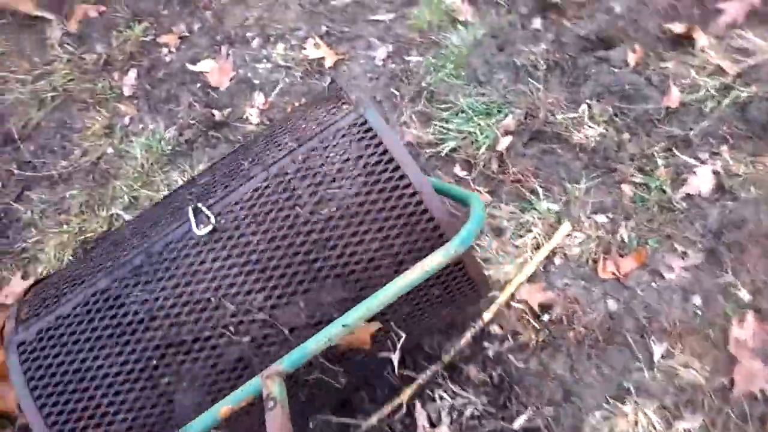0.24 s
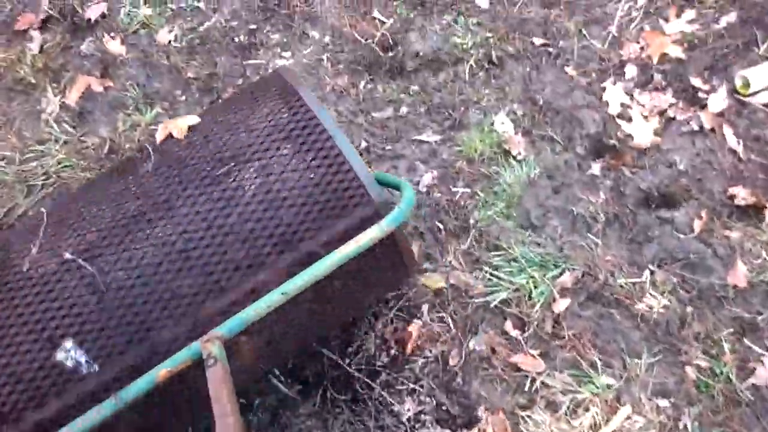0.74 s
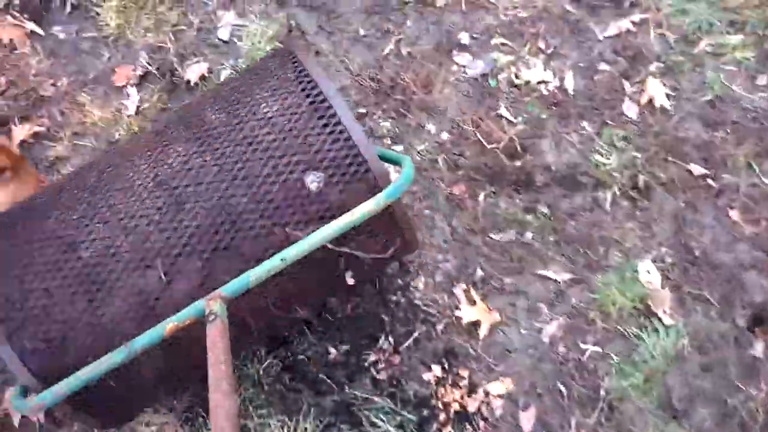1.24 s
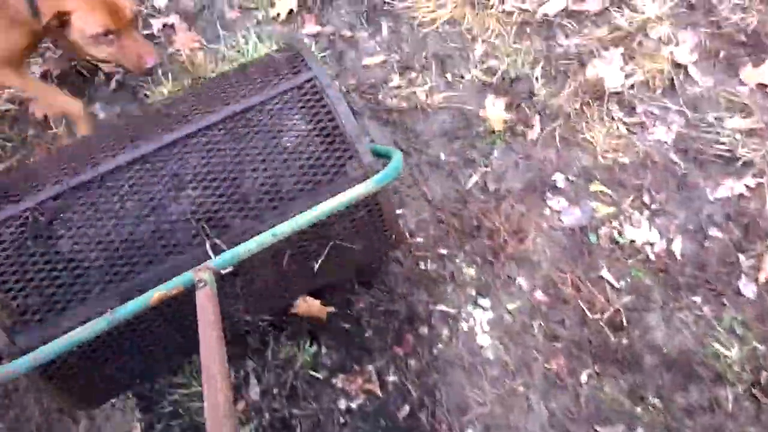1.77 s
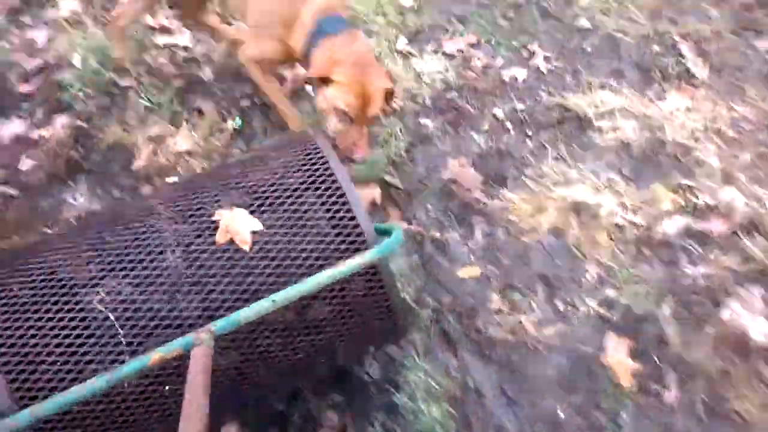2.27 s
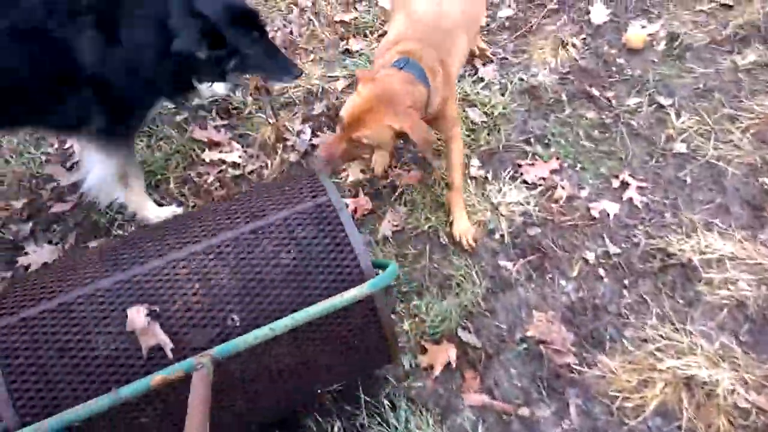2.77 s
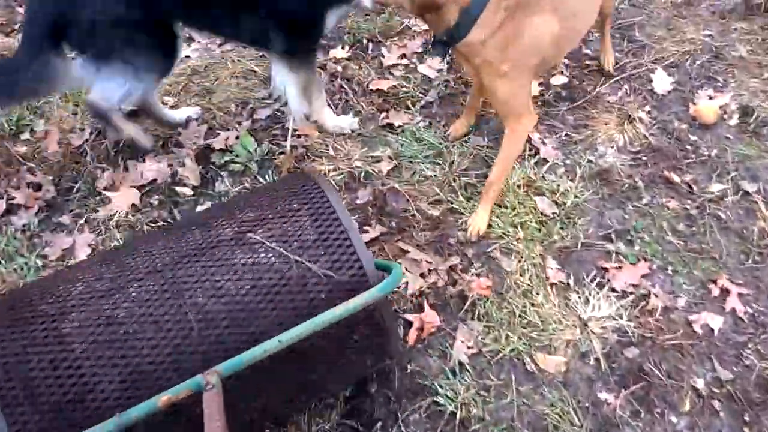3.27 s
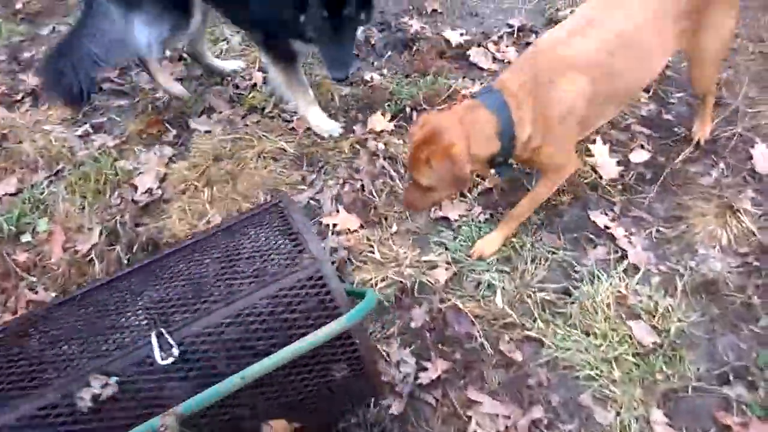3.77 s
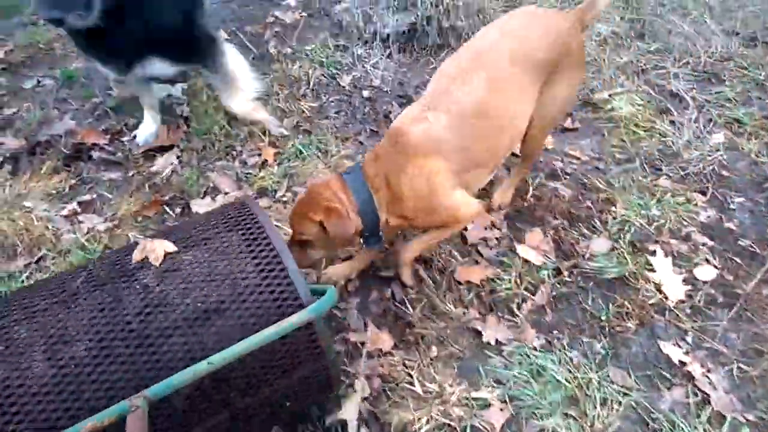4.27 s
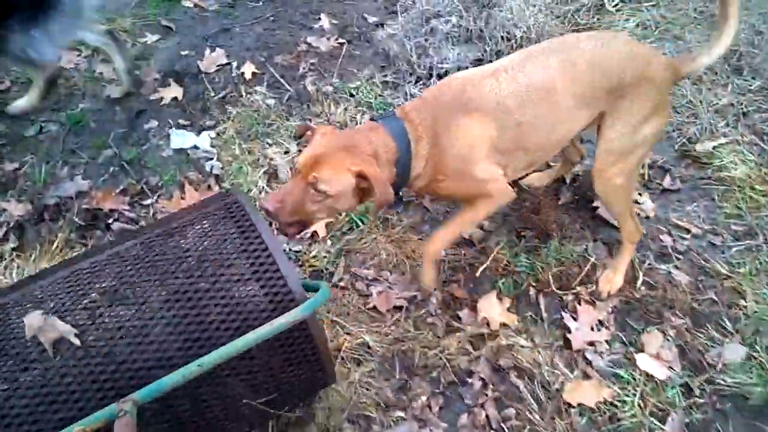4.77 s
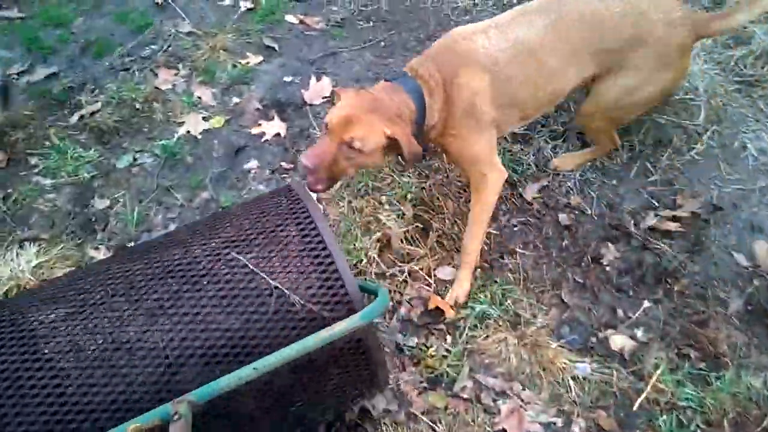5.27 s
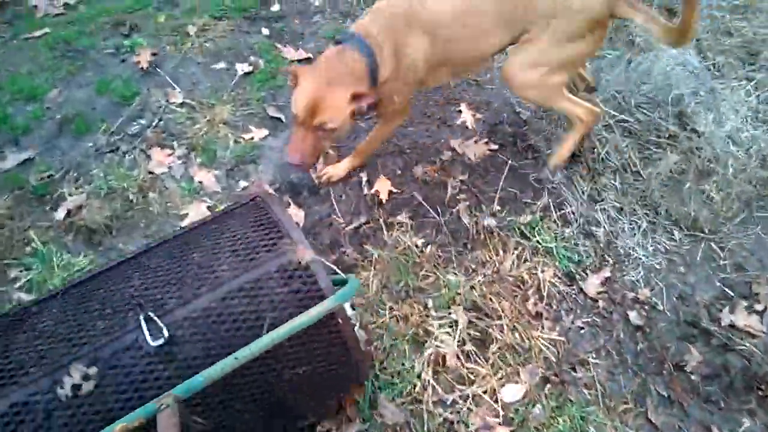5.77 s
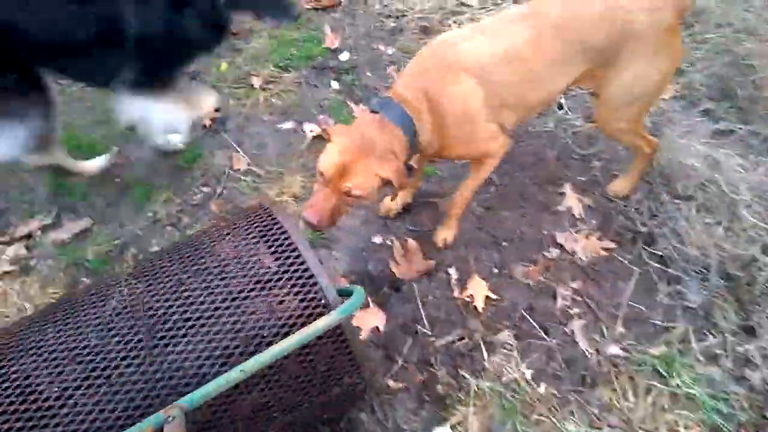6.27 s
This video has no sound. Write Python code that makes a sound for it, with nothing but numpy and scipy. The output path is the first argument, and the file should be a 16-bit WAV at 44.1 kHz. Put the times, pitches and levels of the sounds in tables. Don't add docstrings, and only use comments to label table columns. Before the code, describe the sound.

A loud hoarse bark is already under way at 0 s and falls off, with crackling leaves under it. A thinner arched yelp follows at 0.25-0.5 s, a high bark at 0.65, a tiny yelp near 1.15 and a short rising bark at 1.45. A clipped rough bark comes at 2.25, then a long falling yelp at 2.6-2.85, a low muttered woof at 2.95 and a thin quiet whine at 3.15. Barking pauses until about 4.15: dry leaves rustle, twigs tick, a paw thuds at 3.45. Then raspy barks at 4.15, 4.75, 5.25, 5.75 and 6.25, with small grumbles between and a thud at 4.5. Axle squeaks are thin and quiet, clearest at 4.3 and 6.25. Faint dog moans sit near 1.2, 1.7 and 4.5. Dull short yard echoes and low distant traffic hum throughout.

```python
import sys
import numpy as np
from scipy import signal
from scipy.fft import rfft, irfft
from scipy.io import wavfile
from scipy.ndimage import uniform_filter1d

SR = 44100
rng = np.random.default_rng(int(sys.argv[2]) if len(sys.argv) > 2 else 0)


def to_wav(sig):
    pcm = np.clip(np.atleast_2d(sig), -1, 1) * 32767
    pcm = np.round(pcm).astype(np.int16)
    wavfile.write(sys.argv[1], SR, pcm.T)


def linear_from_db(decibels):
    return 10 ** (np.asarray(decibels, float) / 20)


N = 287091

# t/s, hold/s, start f/Hz, end f/Hz, level/dB
BARKS = [
    (-0.1, .13, 371, 346, -10),
    (0.655, 0.1, 505.8, 489, -11),
    (1.473, 0.074, 534.5, 564, -12),
    (2.251, 0.055, 490.3, 546, -10.5),
    (4.167, 0.082, 486.3, 506, -10),
    (4.764, 0.094, 518.7, 530.3, -11.5),
    (5.262, .09, 534, 498.4, -12.5),
    (5.732, 0.094, 457, 479.5, -10.5),
    (6.243, .09, 457, 416.5, -10.5),
]
# first resonance at start f/Hz, at end f/Hz,
# second against first level/dB, fundamental against bark level/dB
MOUTHS = [(1100, 904, -6.5, -29), (960, 940, 0.5, -19), (1040, 840, -7, -6), (740, 970, 0.5, -12),
          (1040, 1090, -1, -14), (880, 1100, -4.5, -9.5), (900, 900, -6.5, -8.5), (560, 560, -4.5, -27),
          (800, 900, -5.5, -21.5)]
# release/s, pitch share at the knee, loss at the knee/dB,
# dying fundamental against level/dB
RELEASES = [(.12, .62, 19.2, -10), (.12, .62, 11, -5), (.07, .8, 1.4, -4), (.14, .55, 8.3, -8.5),
            (.19, .46, 25.7, 10), (.1, 0.51, 10.1, -19.5), (.1, .67, 4.2, -18), (.12, .54, 8.4, -6),
            (0.083, .72, 6.2, -9)]
BARK_CHAOS = [(.35, .5), (.45, .55), (.22, .7), (.7, .75), (.55, .3), (.37, .7), (.35, .7), (.48, .15),
              (.48, .25)]
# t/s, start f/Hz, on the way f/Hz, start level/dB, on the way level/dB
RUN_UPS = [
    (0.579, 294.3, 376.3, -45, -24.5),
    (1.41, 278.7, 439.3, -45, -17.5),
    (5.176, 282, 414.8, -29, -16),
    (5.65, 181.4, 322.8, -33.5, -12),
    (6.172, 275, 408.6, -30, -13),
]
# t/s, length/s, f/Hz, upper voice level/dB, fundamental level/dB
BREAKS = [
    (2.223, 0.016, 725.3, -17.5, -19.5),
    (4.136, 0.023, 697, -19.5, -26.5),
    (4.719, 0.034, 633.6, -18.5, -13),
]
# t/s, f/Hz, level/dB, first mouth resonance f/Hz, second against first level/dB
YELPS = [
    [(0.235, 217.4, -49, 844, -24), (0.251, 240, -32, 950, -20), (0.315, 381, -16, 1190, -16),
     (0.372, 422, -20, 1130, -15), (0.382, 446.6, -29, 900, -12), (0.422, 454.7, -17.5, 755, 18),
     (0.434, 364, -12.5, 1050, -16), (0.48, 260.4, -25, 840, -4), (0.54, 200, -43, 690, -19)],
    [(1.1, 399, -52, 513, -50), (1.14, 513, -30.5, 500, -23), (1.194, 491, -27, 745, -8),
     (1.26, 292, -43, 700, -22)],
    [(2.545, 368.3, -50, 640, -37), (2.577, 285.5, -22.5, 688, -20.5), (2.645, 412, -17, 830, -6.5),
     (2.68, 441.3, -10.5, 930, 3.5), (2.709, 426, -13, 880, 1), (2.73, 345, -12.5, 760, 1),
     (2.756, 252.6, -18.5, 730, -7.5), (2.798, 194.5, -24.5, 710, -7), (2.87, 149.4, -42.5, 694, -10)],
]
WOOFS = [
    [(2.912, 232, -60, 706, -16), (2.93, 229.4, -20.5, 708, -36), (2.97, 266.6, -32.5, 740, -7),
     (3.006, 248.4, -25, 730, -31), (3.056, 222, -37.5, 706, -10)],
    [(5.09, 357, -41.5, 613, -13), (5.122, 561, -30.5, 574, -12), (5.15, 588, -25.5, 575, -16),
     (5.18, 562, -30, 575, -16)],
    [(5.53, 181.8, -47, 554, -19), (5.594, 158.2, -30.5, 513, -11), (5.642, 170.2, -34, 504, -20)],
]
# crack t/s, chaos before 0-1, chaos after 0-1
CRACKS = [(.425, .04, .16), (1.185, .05, .72), (2.72, .03, .13), (3.03, .08, .15), (5.13, .3, .22),
          (5.6, .15, .06)]
CHEST_TRIM_DB = [6, 1, -10, -15, 6, -7]
# f/Hz, level/dB
YELP_CHEST = [(180, -13), (260, -22), (380, -26.5), (450, -17.5), (510, -1)]
# f/Hz, level/dB
HEAD = [(400, -10), (520, 0), (620, 2), (800, -2), (1050, 0), (1450, -2), (1800, 0), (2100, 0), (2400, -6),
        (2700, -2), (3300, -14), (4200, -30), (5800, -20), (9000, -34)]
# f/Hz, level per Hz/dB
BREATH = [(2200, -22.5), (2800, -19), (3600, -25), (4300, -35), (5000, 1.5), (5700, 4), (6500, 0.5),
          (7600, 2.5), (9000, -8.5), (12000, -18), (15700, -14)]
# t/s, f/Hz, level/dB
WHINE = [(3.11, 1130, -83), (3.142, 1170, -45.5), (3.182, 1151, -43.5), (3.24, 1060, -68)]
# t/s, length/s, start f/Hz, end f/Hz, level/dB
SQUEAKS = [
    (1.084, 0.07, 7130, 6500, -54),
    (2.388, 0.23, 3600, 3580, -60),
    (3.342, 0.074, 2780, 2680, -63.5),
    (4.309, 0.096, 4410, 3620, -50.5),
    (4.92, 0.082, 5100, 5570, -61),
    (6.238, 0.14, 3320, 3200, -47),
    (6.356, .13, 3400, 3900, -58.5),
]
# t/s, length/s, start f/Hz, end f/Hz, level/dB
MOANS = [
    (1.174, 0.098, 235, 244, -50.5),
    (1.646, 0.19, 319.4, 309, -56.5),
    (4.446, 0.165, 301, 261, -52),
]
# t/s, length/s, level/dB
RUSTLE = [(0, .03, -54), (0.21, 0.51, -47.5), (0.825, 0.0081, -53), (1.125, 0.01, -53), (1.471, 0.15, -51),
          (1.604, 0.18, -58.5), (1.847, 0.015, -59), (2.012, 0.092, -50), (2.173, 0.0062, -57.5),
          (2.278, 0.17, -50.5), (2.46, 0.26, -57), (2.963, 0.23, -59), (3.444, 0.06, -55),
          (3.871, 0.18, -47.5), (4.191, 0.17, -47), (4.436, 0.45, -57), (5.25, 0.27, -59),
          (5.445, 0.35, -60.5), (5.734, .32, -49), (6.194, 0.17, -51), (6.404, 0.13, -55.5)]
# f/Hz, level per Hz/dB
LEAVES = [(300, -14.5), (800, 4), (2000, -2), (3500, 3), (4800, 1.5), (6500, -2), (8600, 4), (10500, 0.5),
          (13000, -3.5), (15700, -13)]
# t/s, peak level/dB, f/Hz
TICKS = [(0.2765, -19, 3970), (0.843, -23, 15400), (0.9447, -27.5, 2740), (0.9812, -31.5, 3770),
         (1.0126, -41, 4380), (1.7948, -35.5, 7100), (1.8138, -51, 7000), (1.8677, -28, 10900),
         (2.172, -41, 11200), (3.5533, -35, 15200), (3.6474, -35.5, 11500), (6.2582, -67.5, 3340)]
# t/s, peak level/dB, f/Hz
THUDS = [
    (3.444, -28, 610),
    (3.699, -47, 630),
    (4.509, -26, 645),
]
# delay t/s, level/dB
ECHOES = [(0.035, -14.5), (0.058, -31), (.094, -46), (0.143, -32)]
# f/Hz, level per Hz/dB
HUM = [(20, -17.5), (45, 0.5), (65, 5.5), (120, -1.5), (200, -6.5), (350, -12.5), (700, -13), (1300, -19.5),
       (2500, -26.5), (5000, -32), (10000, -49), (13000, -44), (16000, -81)]
# t/s, level/dB
HUM_LEVEL = [(0.0, -45), (0.12, -48), (1.94, -50.5), (4.57, -45), (4.97, -51.5), (5.08, -47.5),
             (6.51, -50.5)]

END_PITCH, END_LOSS_DB, SHUT_HZ = 0.26, 45, 611
SHUT_SECOND_DB = 5.5
KNEE = .4
KNEE_CHEST_DB, KNEE_SHARE = -28.5, 0.67
RUN_UP_MOUTH_HZ, RUN_UP_CHEST_DB, RUN_UP_CHAOS = 755, -36, .13
JUMP_S, OVERSHOOT_DB = 0.0081, 1
ON_THE_WAY = .7
CHEST_LAG = 1.9
BREAK_ATTACK, BREAK_START_DB, BREAK_SCOOP, BREAK_CHAOS = 0.33, -41.5, 0.83, .15
SECOND_DB, SECOND_PER_DB = 2, 1.54
DULL_FROM_HZ, DULL_DB = 2900, 1.1
RASP_DB = 4
SWELL_DB = 4
RUSTLE_RISE_DB_S, RUSTLE_FALL_DB_S, RUSTLE_REST_DB = 282, 184, -69.5


def dog():
    voice, air = np.zeros(N), np.zeros(N)
    calls = []
    for piece in gestures():
        touching = calls and piece[0][1] > .55 * calls[-1][-1][1] and piece[0][0] - calls[-1][-1][0] < 1 / 30
        if touching:
            calls[-1] = sorted(calls[-1] + piece)
        else:
            calls.append(piece)
    for rows in calls:
        at, voiced, flow = bark(rows)
        voice[at] += voiced
        air[at] = flow
    return voice + linear_from_db(-4.5) * air * breath() + glide(WHINE, waver=0.003)


def gestures():
    barks = bark_gestures()
    return sorted(barks + run_up_gestures(barks) + break_gestures() + yelp_gestures())


def bark_gestures():
    pieces = []
    for held_bark, shape, release_shape, chaos in zip(BARKS, MOUTHS, RELEASES, BARK_CHAOS):
        s, hold, hz, end_hz, db = held_bark
        first, end_first, upper, chest = shape
        release, sag, loss_db, dying_db = release_shape
        held, freed = chaos
        off, knee_db, end_db = s + hold, db - loss_db, db - END_LOSS_DB
        knee_chest_db = knee_db + KNEE_CHEST_DB + KNEE_SHARE * (dying_db + loss_db)
        pieces.append([
            (s, hz, db, first, upper, db + chest, held),
            (off, end_hz, db, end_first, upper, db + chest, held),
            (off + KNEE * release, sag * end_hz, knee_db, SHUT_HZ, upper - SHUT_SECOND_DB, knee_chest_db, freed),
            (off + release, END_PITCH * end_hz, end_db, SHUT_HZ, upper - 2 * SHUT_SECOND_DB,
             end_db + dying_db, freed)])
    return pieces


def run_up_gestures(barks):
    pieces = []
    for s, hz, way_hz, db, way_db in RUN_UPS:
        end, end_hz, end_db, first, upper, chest_db, _ = min(p[0] for p in barks if p[0][0] > s)
        way_s = s + ON_THE_WAY * (end - s)
        way_chest_db = way_db + CHEST_LAG * (chest_db - end_db)
        pieces.append([
            (s, hz, db, RUN_UP_MOUTH_HZ, second(db), db + RUN_UP_CHEST_DB, RUN_UP_CHAOS),
            (way_s, way_hz, way_db, first, second(way_db), way_chest_db, RUN_UP_CHAOS),
            (end - JUMP_S, end_hz, end_db + OVERSHOOT_DB, first, upper, chest_db, RUN_UP_CHAOS)])
    return pieces


def break_gestures():
    pieces = []
    for s, length, hz, db, chest_db in BREAKS:
        upper = second(db)
        pieces.append([
            (s, BREAK_SCOOP * hz, db + BREAK_START_DB, hz, upper, chest_db + BREAK_START_DB, BREAK_CHAOS),
            (s + BREAK_ATTACK * length, hz, db - 5, hz, upper, chest_db, BREAK_CHAOS),
            (s + length, hz, db, hz, upper, chest_db - 0.5, BREAK_CHAOS)])
    return pieces


def yelp_gestures():
    pieces = []
    for rows, (crack, before, after), trim_db in zip(YELPS + WOOFS, CRACKS, CHEST_TRIM_DB):
        piece = []
        for s, hz, db, first, upper in rows:
            chest_db = db + trim_db + at_hz(YELP_CHEST, hz)
            piece.append((s, hz, db, first, upper, chest_db, after if s > crack else before))
        pieces.append(piece)
    return pieces


def second(level_db):
    return SECOND_DB + SECOND_PER_DB * (level_db + 12.5)


def bark(rows, chaos_hz=58., jitter=.025):
    at, t = span(rows)
    size = len(t)
    *curves, hoarse = in_time(rows, t)
    pitch, level_db, first_hz, second_db, chest_db = uniform_filter1d(curves, size=200, axis=1, mode="nearest")
    tract = first_hz[::8], second_db[::8], level_db[::8] + 13.0
    shaky_pitch = pitch * (1 + jitter * np.sqrt(hoarse) * wander(51.5, size))
    phase = 2 * np.pi * np.cumsum(shaky_pitch) / SR
    clean, chaos, clean_power, chaos_power = 0, 0, 0, 0
    for k in range(2, 19):
        gain = mouth(k * pitch[::8], *tract).repeat(8)[:size]
        shimmer = linear_from_db(2.64 * wander(13.0, size, count=2500))
        kept = (1 - hoarse) ** (k * k / 12 - 1 / 3) * shimmer
        clean = clean + kept * gain * np.cos(k * phase + k * k)
        clean_power = clean_power + gain ** 2 / 2
    for k in np.arange(7, 66, 2) / 6:
        gain = mouth(k * pitch[::8], *tract).repeat(8)[:size]
        shake = wander(chaos_hz, size, count=600) * np.cos(k * phase)
        shake = shake + wander(chaos_hz, size, count=600) * np.sin(k * phase)
        chaos = chaos + gain * shake
        chaos_power = chaos_power + gain ** 2
    upper = np.sqrt((1 - hoarse) / clean_power) * clean + np.sqrt(hoarse / chaos_power) * chaos
    upper = signal.sosfilt(signal.butter(6, 440, "high", fs=SR, output="sos"), upper)
    unsteady_db = 3.5 * np.sqrt(hoarse) * wander(25., size)
    chest = np.sqrt(2) * linear_from_db(chest_db + unsteady_db) * np.cos(phase)
    fade = np.minimum(1, np.minimum(t - t[0] + (at[0] == 0), t[-1] - t) * 500)
    air = linear_from_db(1.3 * np.minimum(level_db, -12) - 24) * (1 + .9 * np.cos(phase)) * (.3 + hoarse)
    return at, fade * (linear_from_db(level_db - 3.5) * upper + chest), air


def mouth(hz, first_hz, second_db, effort_db, valley_db=-28):
    opening = np.clip(1 + effort_db / 30, .2, 1.1)
    first = hump(hz, first_hz, 60 + 220 * opening)
    throat = linear_from_db(-14.5 + 10.3 * opening) * hump(hz, 586.0, 67.0)
    upper = hump(hz, 1700 + 99.0 * opening, 295.0) + 0.71 * hump(hz, 1240.0, 450.0)
    upper = upper + .2 * hump(hz, 2395.0, 336.0) + .12 * hump(hz, 3050.0, 320.0)
    valleys = linear_from_db(valley_db + 0.66 * effort_db)
    dull_db = DULL_DB * np.minimum(effort_db, 0) * np.log2(np.maximum(hz / DULL_FROM_HZ, 1))
    return (first + throat + linear_from_db(second_db) * upper + valleys) * linear_from_db(at_hz(HEAD, hz) + dull_db)


def hump(hz, centre_hz, width_hz):
    return 1 / (1 + ((hz - centre_hz) / width_hz) ** 2) ** 2


def breath():
    white = rng.standard_normal(N)
    edges = np.geomspace(2000, 16000, 15)
    air = 0
    for edge in zip(edges, edges[1:]):
        band = signal.sosfilt(signal.butter(2, edge, "band", fs=SR, output="sos"), white)
        air = air + band * linear_from_db(RASP_DB * slow_wander(90.))
    return coloured(BREATH, air)


def yard(x):
    t = np.arange(round(.3 * SR)) / SR
    shape = sum(linear_from_db(db) * (t > s) * np.exp(-np.maximum(t - s, 0) / 0.017) for s, db in ECHOES)
    tail = signal.fftconvolve(x, 0.024 * shape * rng.standard_normal(len(t)))[:N]
    return signal.sosfilt(signal.butter(2, [400, 2500], "band", fs=SR, output="sos"), tail)


def leaves(cracks_per_s=15000., spread_db=2., patchy_db=2.2, cycles=160.):
    level_db = crushing()
    sizes = linear_from_db(spread_db * np.minimum(rng.exponential(1, N), 4))
    cracks = (rng.random(N) < cracks_per_s / SR) * sizes * rng.choice([-1, 1], N)
    dealt = rng.integers(0, 40, N)
    rings = 0
    for k, hz in enumerate(np.geomspace(1500, 15500, 40)):
        r = linear_from_db(-60 * hz / cycles / SR)
        resonator = [1, -2 * r * np.cos(2 * np.pi * hz / SR), r * r]
        ring = signal.lfilter([1, 0, -1], resonator, cracks * (dealt == k) + 1e-18)
        rings = rings + rms_one(ring) * np.sqrt(hz) * linear_from_db(2 * patchy_db * slow_wander(35.0))
    hiss = rng.standard_normal(N)
    dry_leaves = coloured(LEAVES, hiss + .9 * rms_one(rings) + .15 * rms_one(cracks))
    return linear_from_db(level_db + 1.0 + 2.47 * wander(17.2, N)) * dry_leaves


def crushing():
    t = np.arange(N) / SR
    level_db = np.full(N, float(RUSTLE_REST_DB))
    for s, length, db in RUSTLE:
        rise_db = RUSTLE_RISE_DB_S * np.maximum(s - t, 0)
        fall_db = RUSTLE_FALL_DB_S * np.maximum(t - s - length, 0)
        level_db = np.maximum(level_db, db - rise_db - fall_db)
    return level_db


def knocks(events, dies_s, width, trim_db):
    out, t = np.zeros(N + 4410), np.arange(4410) / SR
    for s, peak_db, hz in events:
        edges = [hz / (1 + width), min(hz * (1 + width), 17000)]
        band = signal.butter(1, edges, "band", fs=SR, output="sos")
        burst = rms_one(signal.sosfilt(band, rng.standard_normal(4410))) * np.exp(-t / dies_s)
        out[round(s * SR):][:4410] += linear_from_db(peak_db + trim_db) * burst
    return out[:N]


def ticks_and_thuds():
    ticks = knocks(TICKS, dies_s=0.0067, width=0.35, trim_db=-13.5)
    return ticks + knocks(THUDS, dies_s=0.028, width=0.13, trim_db=-15.5)


def axle():
    return sum(glide(swell(*row), waver=0.018, overtone_db=-14, flutter_db=4.5) for row in SQUEAKS)


def other_dog():
    return sum(glide(swell(*row), waver=0.03) for row in MOANS)


def swell(s, length, hz, end_hz, db):
    return [(s, hz, db - SWELL_DB), (s + length / 2, (hz + end_hz) / 2, db), (s + length, end_hz, db - SWELL_DB)]


def glide(rows, waver, overtone_db=-40, flutter_db=3.5):
    at, t = span(rows)
    hz, level_db = in_time(rows, t)
    phase = 2 * np.pi * np.cumsum(hz * (1 + waver * wander(71.0, len(t)))) / SR
    tone = np.sin(phase) + linear_from_db(overtone_db) * np.sin(2 * phase)
    level = linear_from_db(level_db + flutter_db * wander(40., len(t)))
    out = np.zeros(N)
    out[at] = np.sqrt(2) * level * signal.windows.tukey(len(t), .3) * tone
    return out


def hum():
    level_db, = in_time(HUM_LEVEL, np.arange(N) / SR)
    return linear_from_db(level_db - 1.9 + 0.25 * wander(32.0, N)) * coloured(HUM, rng.standard_normal(N))


def rms_one(x):
    return x / np.sqrt(np.mean(np.abs(x) ** 2) + 1e-20)


def in_time(rows, t):
    s, *columns = np.transpose(rows)
    return [np.interp(t, s, c) for c in columns]


def at_hz(points, hz):
    point_hz, db = np.transpose(points)
    return np.interp(np.log(hz), np.log(point_hz), db)


def span(rows):
    at = np.arange(max(round(rows[0][0] * SR), 0), min(round(rows[-1][0] * SR), N))
    return at, at / SR


def wander(hz, size, count=9000):
    r = np.exp(-2 * np.pi * hz / SR)
    smooth = signal.lfilter([1], [1, -2 * r, r * r], rng.standard_normal(size + count))
    return rms_one(smooth[count:])


def slow_wander(hz):
    return wander(hz, N // 8 + 1).repeat(8)[:N]


def coloured(spectrum, x):
    hz = np.maximum(np.arange(N // 2 + 1) * SR / N, 1)
    return rms_one(irfft(rfft(x) * linear_from_db(at_hz(spectrum, hz)), N))


def scene():
    calls = dog()
    ground = leaves() + ticks_and_thuds() + axle()
    return (calls + yard(calls) + ground + other_dog() + hum())[None]


def band_limit(x):
    return signal.sosfilt(signal.butter(12, 15800, fs=SR, output="sos"), x)


def record(dry):
    mix = .8 * np.tanh(dry / .8)
    return band_limit(mix)


dry = scene()
out = record(dry)
to_wav(out)
```